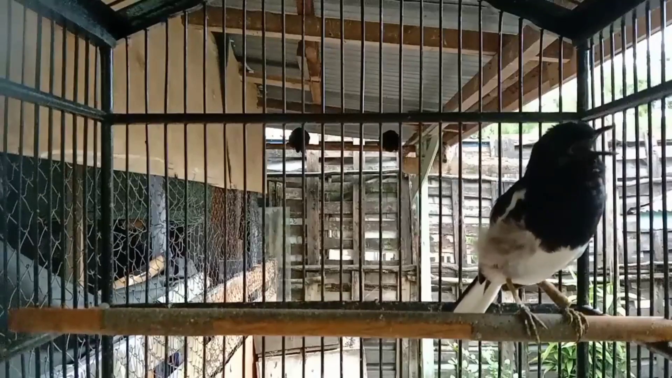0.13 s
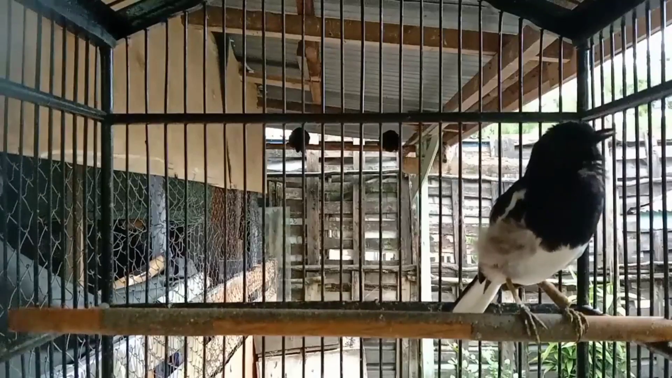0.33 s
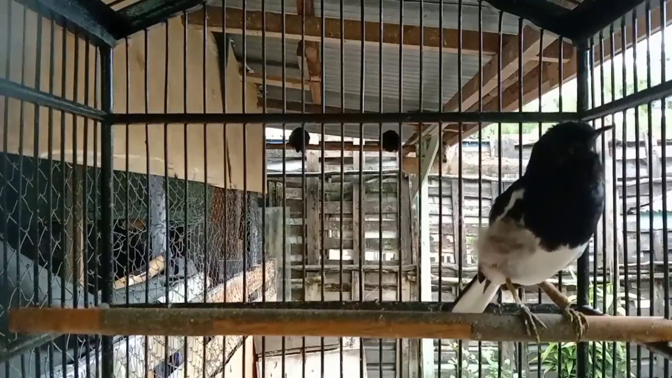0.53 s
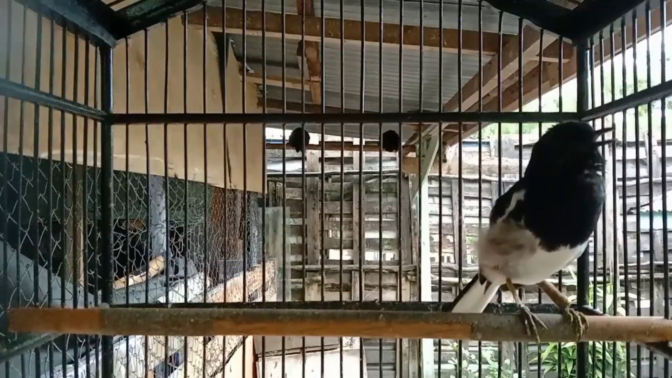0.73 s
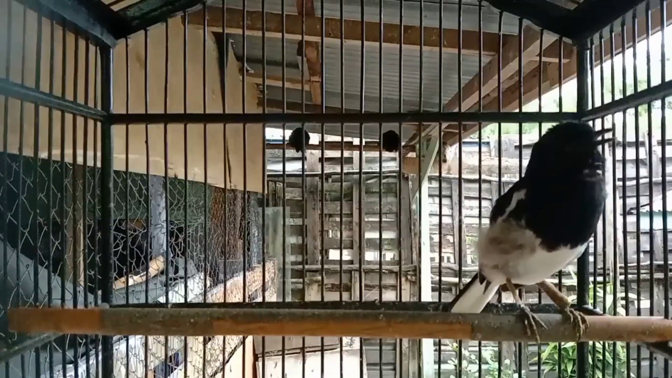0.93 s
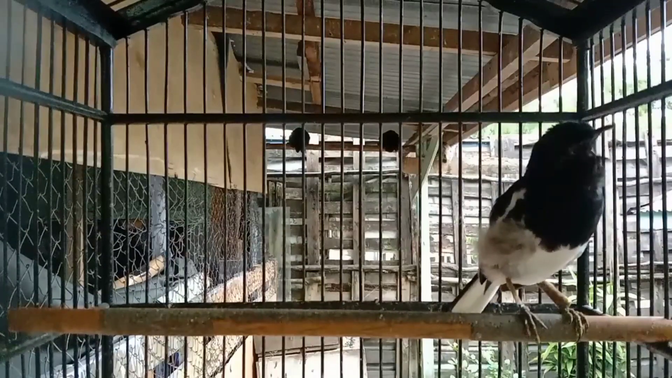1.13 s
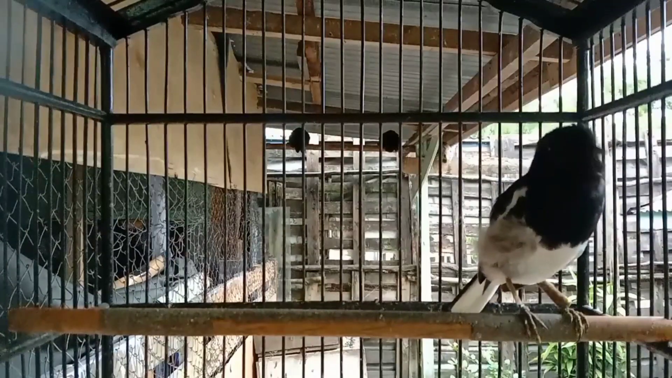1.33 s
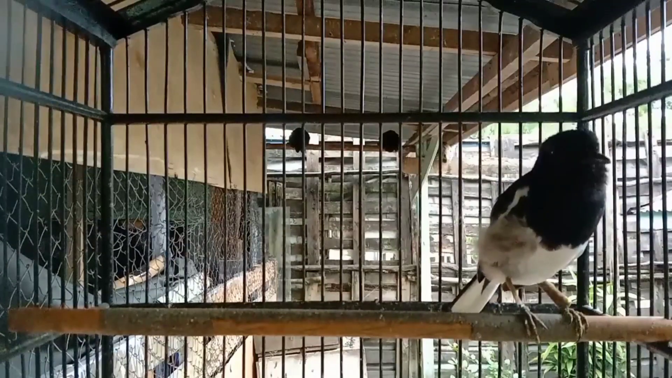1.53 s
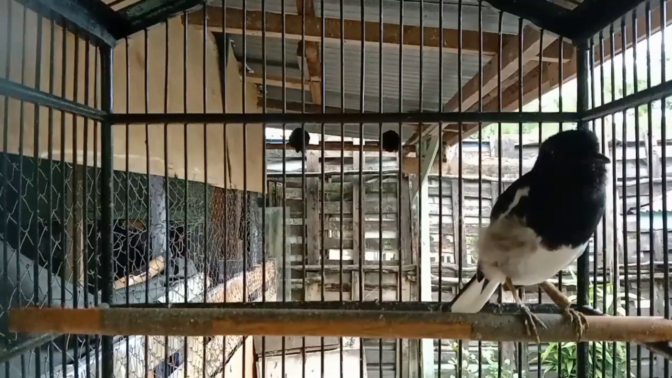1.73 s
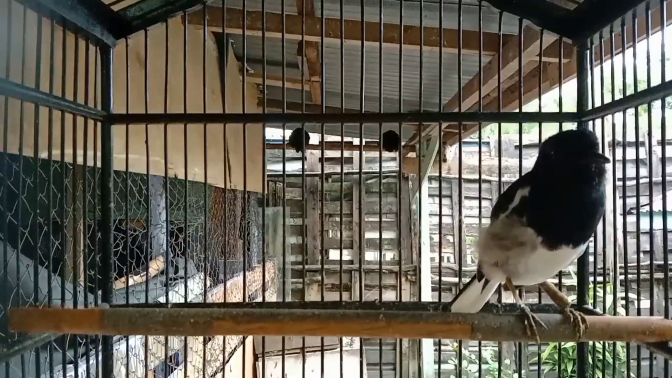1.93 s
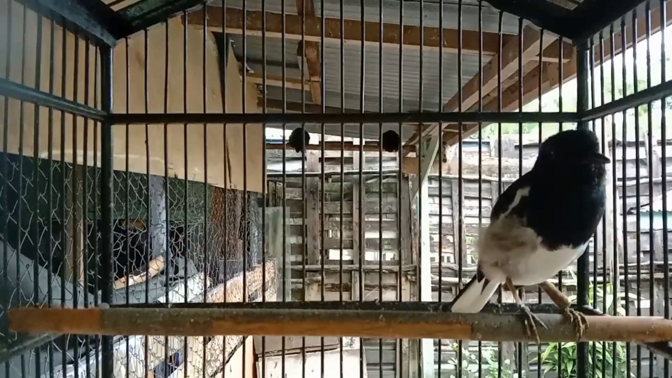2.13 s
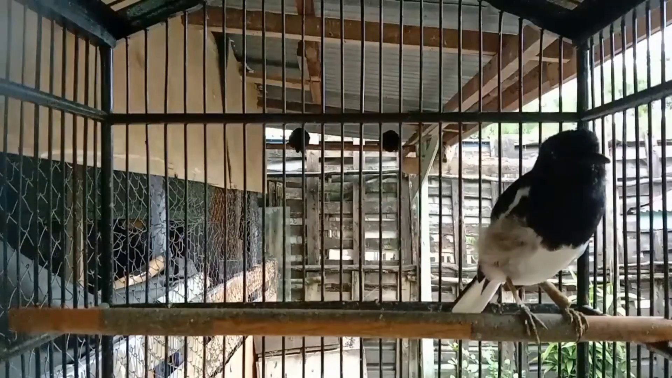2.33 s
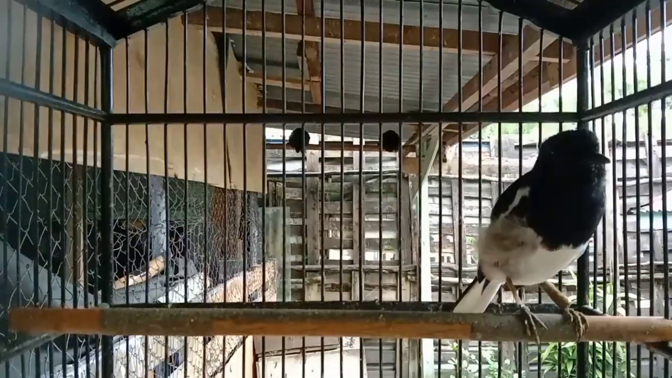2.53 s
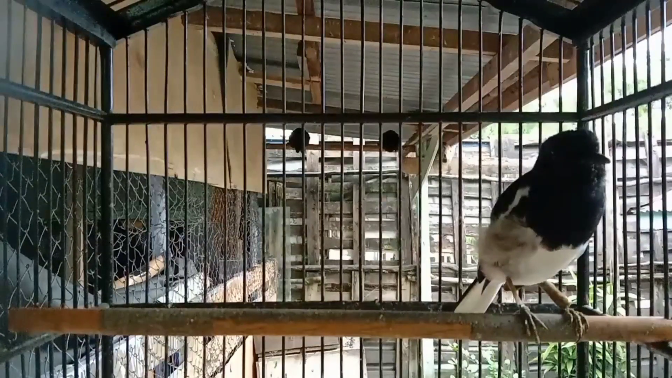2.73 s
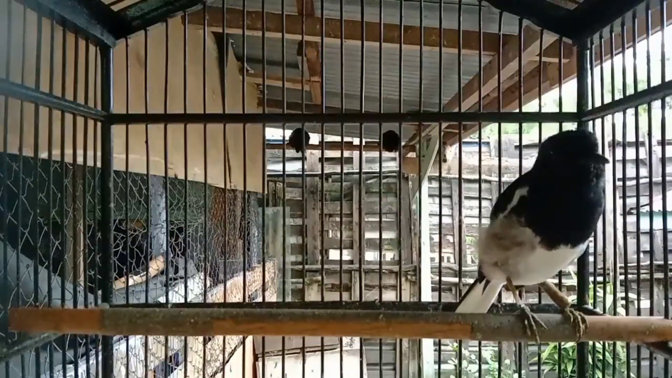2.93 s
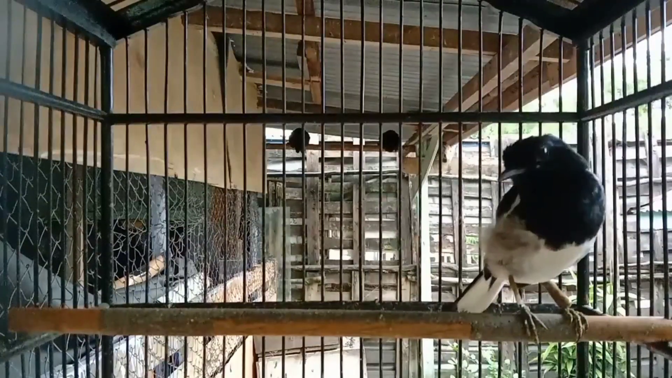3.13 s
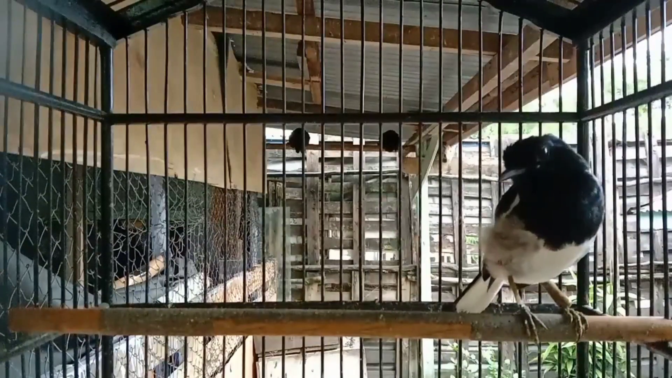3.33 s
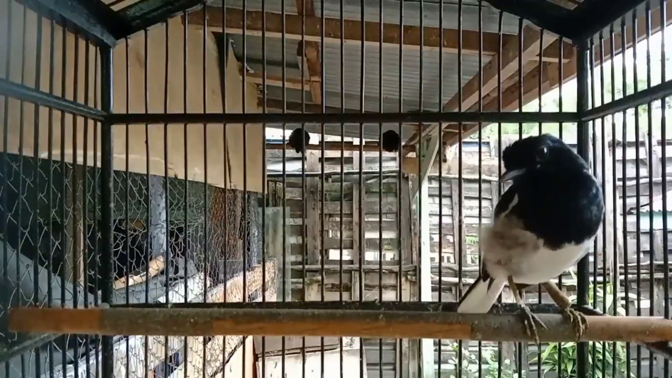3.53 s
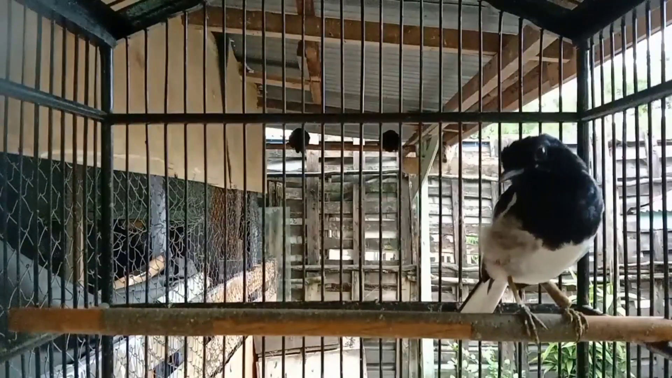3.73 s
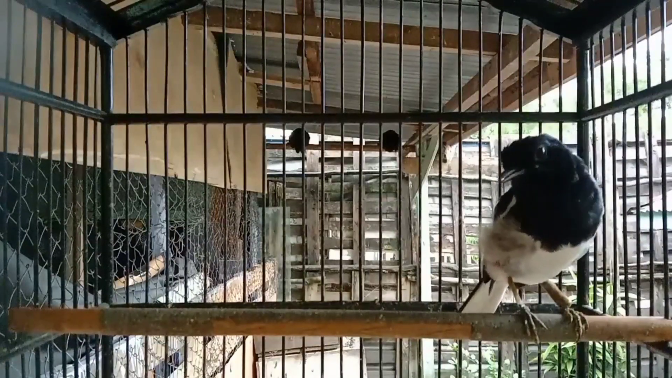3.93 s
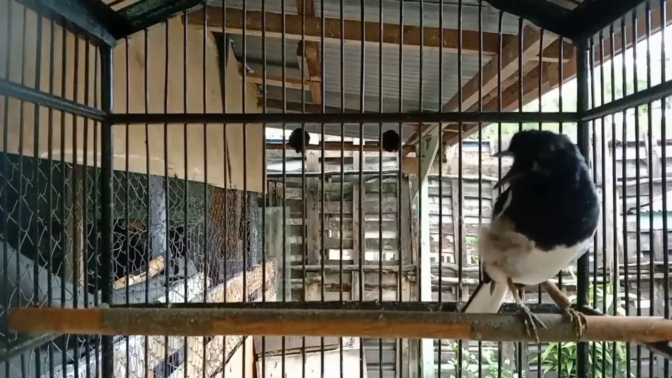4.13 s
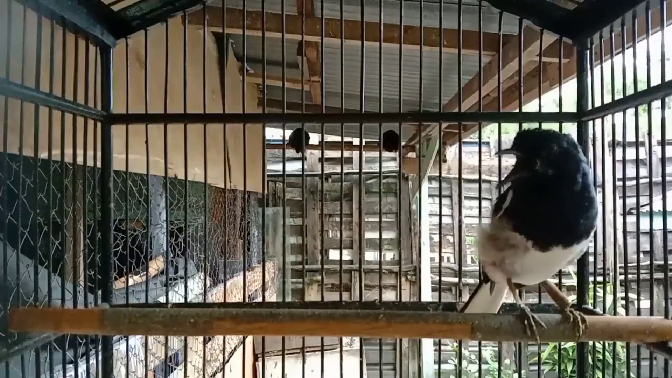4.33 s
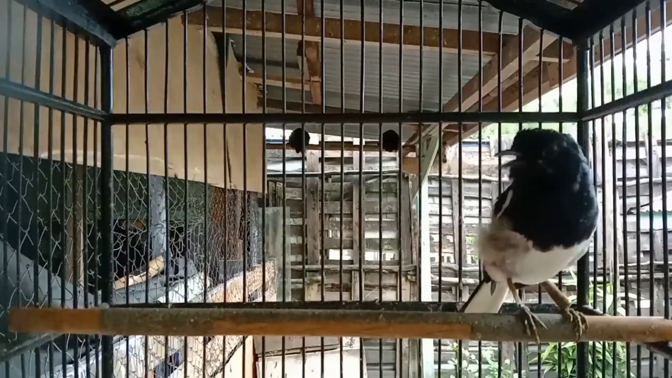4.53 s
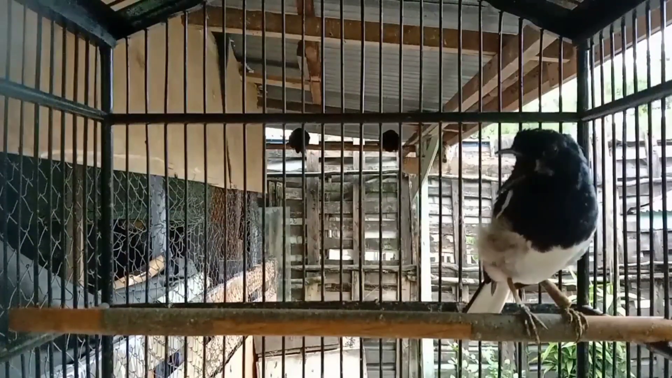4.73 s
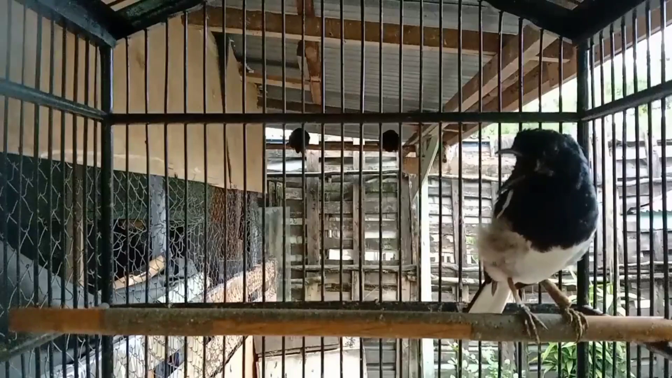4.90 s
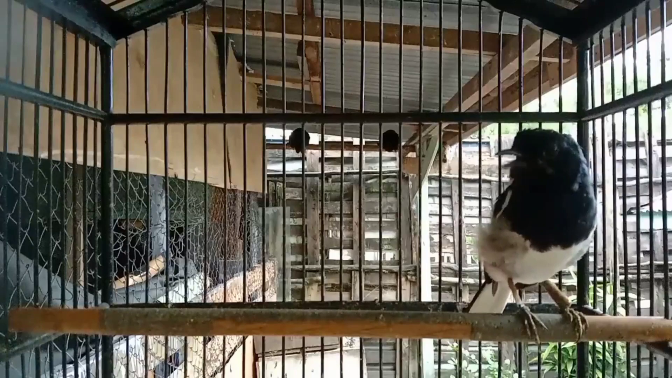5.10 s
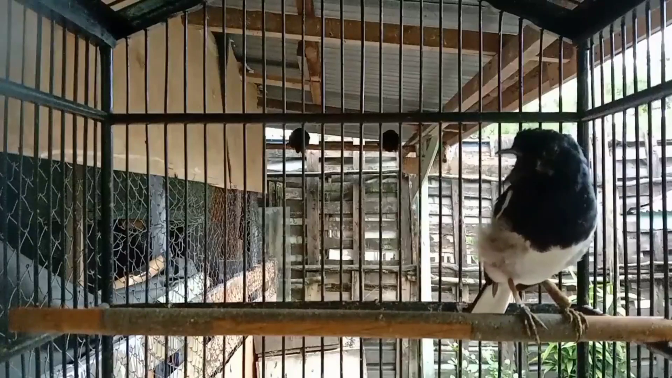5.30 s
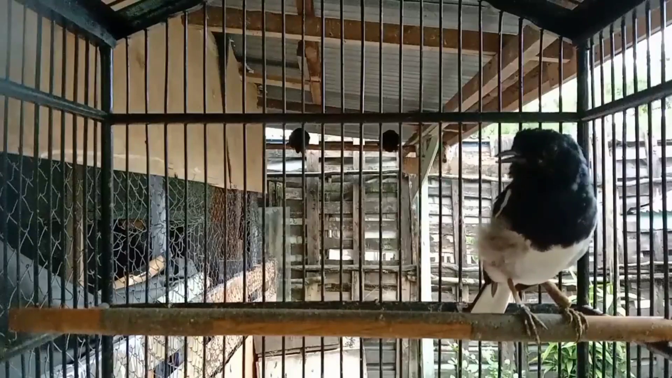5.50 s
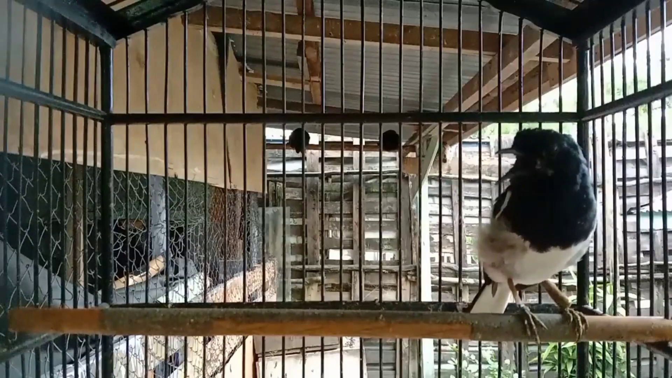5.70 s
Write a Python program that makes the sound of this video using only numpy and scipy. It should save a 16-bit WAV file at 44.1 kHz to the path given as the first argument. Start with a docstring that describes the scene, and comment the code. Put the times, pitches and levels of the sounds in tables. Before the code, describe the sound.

Bright, rapid whistles leap up and down as a songbird sings close by in a cage in an open shed. A pause leaves soft distant whistles, thin high chirps and a light outdoor hiss and rumble. The song returns with a briefly raspy trill, a high held whistle and several quick notes. The cage ticks faintly a few times, and the background dips slightly while the song is loud.

```python
"""Under a shed roof, a caged songbird close to the microphone sings two bursts of whistled phrases,
the second with a trill that cracks. Its syrinx gives a near sine, coloured by throat and beak.
Another bird answers softly from farther off, small birds twitter, and the cage ticks. Outdoor hiss
and rumble fill the pause; the recorder's gain control turns them down while the song is loud."""
import sys
import numpy as np
from scipy import signal
from scipy.io import wavfile
from scipy.ndimage import uniform_filter1d

SR = 44100
rng = np.random.default_rng(int(sys.argv[2]) if len(sys.argv) > 2 else 0)


def int16_out(signal):
    """Quantize to a 16-bit WAV file."""
    q = np.round(np.clip(np.atleast_2d(signal).T, -1, 1) * 32767)
    wavfile.write(sys.argv[1], SR, q.astype(np.int16))


N = 254016


def songbird(leap_hz_per_s=153000, glide_hz_per_s=110000):
    """Whistled syllables: the fundamental's strength follows its pitch, the overtones follow effort."""
    # Each row: effort in dB, its drift by the end in dB, overtone level re effort in dB at the start
    # and at the end, pitch path as (seconds, Hz).
    syllables = [ (-8, -1.5, -21.5, -18.5, [(-.01, 2574), (0.004, 2437), (0.013, 3190), (0.02, 3600),
                 (0.031, 3520), (0.047, 3745), (0.058, 3090), (0.068, 3190), (0.077, 3605), (0.084, 2830),
                 (0.102, 2920), (0.108, 3190), (0.125, 2120)]), (-8, -2, -19, -25, [(0.217, 1810),
                 (0.228, 2840), (0.234, 3160), (0.25, 3182), (0.275, 3390), (0.283, 3226), (0.291, 2460)]),
                 (-7.5, -1, -19, -24, [(0.317, 1980), (0.327, 2627), (0.341, 2950), (0.352, 2930),
                 (0.363, 2845), (0.386, 3347), (0.394, 3010), (0.401, 2630)]),
                 (-8, 5.5, -42, -37, [(0.47, 1615), (0.485, 1866), (0.517, 1738), (0.537, 1710),
                 (0.542, 2090), (0.55, 2040)]), (-6, 1, -29, -29.5, [(0.548, 2010), (0.556, 2454),
                 (0.565, 2525), (0.617, 2466), (0.628, 2530)]), (-7.5, -3.5, -27, -27, [(0.72, 3294),
                 (0.73, 3590), (0.749, 3920), (0.762, 5450), (0.769, 3820), (0.777, 3270), (0.792, 2440),
                 (0.81, 2273), (0.857, 2310), (0.917, 2100), (0.925, 1613), (0.937, 1585)]),
                 (-7.5, -5, -18.5, -15.5, [(1.01, 1510), (1.025, 3280), (1.031, 3680), (1.039, 3880),
                 (1.05, 3460), (1.075, 2500), (1.083, 1840)]), (-12, 9.5, -26.5, -35, [(1.086, 1890),
                 (1.091, 2123), (1.12, 2130), (1.147, 2240), (1.174, 2335), (1.19, 2385)]),
                 (-7, -8, -28.5, -12.5, [(1.266, 1605), (1.282, 3076), (1.289, 3438), (1.3, 3010),
                 (1.338, 1845)]), (-3, -4, -35, -31.5, [(1.343, 1965), (1.361, 2042), (1.383, 2078),
                 (1.424, 2268), (1.448, 2280)]), (-10.5, 2, -27, -27, [(3.938, 1716), (3.946, 2574),
                 (3.954, 2771), (4.003, 2565), (4.058, 2390), (4.088, 2170), (4.104, 1590)]),
                 (-7.5, -3.5, -22, -25.5, [(4.774, 3730), (4.783, 3712), (4.833, 3836), (4.918, 3693),
                 (5.019, 3818), (5.036, 4110)]), (-18, 6.5, -33.5, -24, [(5.022, 3810), (5.047, 4560),
                 (5.092, 4887), (5.128, 4830), (5.181, 4500), (5.206, 4140), (5.227, 3804), (5.242, 3236)]),
                 (-9, -1, -29, -26.5, [(5.355, 1824), (5.371, 2690), (5.397, 2520), (5.413, 2416),
                 (5.435, 2352), (5.46, 2487), (5.472, 2720)]), (-8.5, -6, -21.5, -12.5, [(5.456, 2500),
                 (5.466, 2900), (5.479, 3730), (5.489, 2974), (5.498, 2967), (5.509, 3733), (5.516, 2985),
                 (5.527, 2834), (5.534, 3220), (5.543, 2490), (5.559, 2927), (5.574, 2377), (5.582, 2380)]),
                 (-12, 3, -18.5, -27, [(5.718, 2050), (5.731, 2930), (5.741, 3244), (5.78, 3291)]), ]
    # How strongly the fundamental carries. Each row: pitch in Hz, gain in dB.
    carry = [(1600, -11.5), (1750, -8.5), (1950, -14), (2080, -5), (2180, -7.5), (2250, -16.5), (2295, -8),
             (2335, -7), (2385, -11), (2490, 1), (2750, -6.5), (2950, 3), (3250, 4), (3550, 2), (3750, 0),
             (3900, -2.5), (4450, -4), (4650, -0.5), (4900, -4), (5400, -39)]
    out = np.zeros(N)
    for effort_db, drift_db, *overtone_ends_db, path in syllables:
        t, (hz,) = curves(path)
        speed_hz_per_s = uniform_filter1d(abs(np.gradient(hz)), size=200) * SR
        leap_db = -13 * np.tanh((speed_hz_per_s / leap_hz_per_s) ** 2)  # fundamental dips on leaps
        glide_db = -5 * np.tanh(speed_hz_per_s / glide_hz_per_s)  # overtones thin on glides
        shape_db = read(carry, hz) + leap_db + swell(t, attack_s=.014, release_s=.013)
        level_db = effort_db + drift_db * np.linspace(0, 1, len(t)) + shape_db
        bloom_db = swell(t, attack_s=.019, release_s=.012)
        overtones_db = np.linspace(*overtone_ends_db, len(t)) + bloom_db + glide_db - shape_db
        tone, _ = whistle(hz, level_db, overtones_db)
        add(out, max(t[0], 0), faded(tone[t >= 0]))
    return out


def trill(first_flick_s=4.2745, break_s=4.304):
    """A held note flicked upward 45-62 times a second; early flicks break the voice."""
    # Each row: time in seconds, lowest pitch in Hz, upward flick in Hz, effort in dB.
    path = [(4.26, 2900, 350, -1.5), (4.31, 2894, 249, -5), (4.351, 2839, 345, -1.5),
            (4.439, 2874, 428, -4), (4.531, 2972, 385, -4), (4.67, 2943, 292, -4.5)]
    t, (low_hz, flick_hz, effort_db) = curves(path)
    flicks_per_s = np.interp(t, [4.26, 4.34, 4.435, 4.51, 4.67], [62, 60, 45, 57.5, 57])
    flicks = np.cumsum(flicks_per_s) / SR
    cycle = np.pi * (flicks - np.interp(first_flick_s, t, flicks))
    flick = np.cos(cycle + .45 * np.sin(cycle) ** 2) ** 2  # skewed pulse
    throb = 1 - .62 * np.cos(2 * cycle - .3) ** 2  # two dips a flick
    hoarse = np.exp(-abs(t - break_s) / np.where(t < break_s, .023, .039))
    crack = hoarse * flick ** 3
    dropout_db = uniform_filter1d(-34 * hoarse ** 3 * (t < break_s), size=200)
    level_db = effort_db + swell(t, attack_s=.015, release_s=.029) + dropout_db
    tone, phase = whistle(low_hz + flick_hz * flick ** 1.5, level_db - 12 * crack, overtones_db=-26.5)
    # Broken voice: rasp and an unsteady line between the first two harmonics.
    rasp_band = signal.butter(3, [2200, 12000], "band", fs=SR, output="sos")
    rasp = signal.sosfilt(rasp_band, rng.standard_normal(len(t)))
    broken = .4 * wander(len(t), size=40) * np.sin(1.6 * phase) + .18 * rasp
    out = np.zeros(N)
    add(out, path[0][0], faded(throb * tone + crack * gain_of(level_db) * broken))
    return out


def whistle(hz, level_db, overtones_db, shake_hz=7, flutter_db=.3):
    """The syrinx swings as an unsteady near sine with weak overtones. Returns tone and phase."""
    # Each row: harmonic number, level in dB.
    overtones = [(2, 3.5), (3, -2), (4, -12.5), (5, -17.5), (6, -16), (7, -12)]
    # Throat and beak colour on the overtones. Each row: frequency in Hz, gain in dB.
    beak = [(3000, -1.5), (4500, -1.5), (6000, -1.5), (7500, 0), (9500, -1), (11300, 1), (13500, -14.5),
            (14500, -2), (15300, -1)]
    phase = 2 * np.pi * np.cumsum(hz + shake_hz * wander(len(hz), size=60)) / SR
    upper = sum(gain_of(db + read(beak, k * hz)) * np.sin(k * phase) * (k * hz < SR / 2)
                for k, db in overtones)
    waver = 1 + .3 * wander(len(hz), size=300)
    tone = np.sqrt(2) * (np.sin(phase) + gain_of(overtones_db) * waver * upper)
    return tone * gain_of(level_db + flutter_db * wander(len(hz), size=90)), phase


def answering_bird():
    """Purer, softer whistles from farther away."""
    # Each row: level in dB, its drift by the end in dB, pitch path as (seconds, Hz).
    notes = [ (-51.5, -3, [(1.565, 1876), (1.632, 1950), (1.68, 2020)]), (-50.5, -4, [(1.63, 2390),
             (1.667, 2660), (1.72, 2630)]), (-38, -11, [(1.74, 3990), (1.772, 3214), (1.82, 2880)]),
             (-43.5, 1, [(2.385, 2370), (2.412, 2405), (2.522, 2390), (2.586, 2383), (2.654, 2625),
             (2.68, 2620)]), (-38, -9.5, [(2.775, 3150), (2.791, 3373), (2.853, 3422), (2.919, 3400),
             (3.01, 3080)]), (-47.5, 2, [(3.045, 2740), (3.066, 3006), (3.115, 2900)]),
             (-36.5, -20, [(3.108, 2780), (3.145, 2860), (3.195, 3300)]), (-36.5, -13, [(3.18, 4300),
             (3.203, 3620), (3.265, 2800)]), (-38.5, -8, [(3.3, 2640), (3.312, 2855), (3.375, 2723)]),
             (-49.5, -7, [(3.39, 2000), (3.44, 1916), (3.5, 1830)]), (-50.5, 0, [(3.56, 1656),
             (3.588, 2410), (3.62, 2660), (3.65, 2640)]), (-41.5, -5.5, [(3.7, 3500), (3.712, 3536),
             (3.752, 3362), (3.79, 3530), (3.83, 3550)]), (-42.5, -7.5, [(4.03, 2980), (4.1, 3180),
             (4.15, 3385), (4.25, 3304)]), ]
    out = np.zeros(N)
    for level_db, drift_db, path in notes:
        t, (hz,) = curves(path)
        shape_db = swell(t, attack_s=.011, release_s=.035) + drift_db * np.linspace(0, 1, len(t))
        tone, _ = whistle(hz, level_db + shape_db, overtones_db=-40, shake_hz=25, flutter_db=1.6)
        add(out, t[0], faded(tone))
    return out


def twitter(fall_hz=406, husk_hz=260, decay_db=5.4):
    """Small distant birds: falling chirps whose pitch shakes so fast that it blurs into a band."""
    # Each row: start in seconds, length in seconds, starting pitch in Hz, starting level in dB.
    chirps = [(1.229, 0.2, 5470, -43.5), (1.49, 0.098, 5710, -42.5), (1.639, 0.15, 5660, -44),
              (1.832, 0.074, 5760, -42), (2.316, 0.062, 4370, -54.5), (2.856, 0.11, 5440, -46.5),
              (3.071, .12, 5400, -46.5), (3.37, 0.069, 5440, -48.5), (3.539, .1, 5870, -56),
              (4.13, .22, 5490, -48.5)]
    out = np.zeros(N)
    for start_s, length_s, start_hz, db in chirps:
        progress = np.arange(0, 1, 1 / (length_s * SR))
        hz = start_hz - fall_hz * progress + husk_hz * wander(len(progress), size=25)
        tone = np.sin(2 * np.pi * np.cumsum(hz) / SR)
        add(out, start_s, faded(gain_of(db - decay_db * progress) * tone))
    return out


def cage_ticks():
    """Claws or wire tick on the cage: bright, decaying snaps of noise."""
    # Each row: start in seconds, starting gain in dB, T60 in seconds.
    ticks = [(2.0687, -30, 0.044), (3.1138, -35.5, 0.13), (5.686, -38, 0.044)]
    out, t = np.zeros(N), np.arange(6000) / SR
    highpass = signal.butter(4, 6500, "high", fs=SR, output="sos")
    for start_s, db, t60_s in ticks:
        snap = signal.sosfilt(highpass, rng.standard_normal(len(t)))
        add(out, start_s, snap * gain_of(db - 60 * t / t60_s))
    return out


def outdoor_noise(rms_db=-50):
    """Hiss, a broad hum near 1.4 kHz and lumpy rumble, with drifting patches and treble flicker."""
    # Each row: frequency in Hz, relative spectral density in dB.
    spectrum = [(12, -49.5), (40, -25), (80, 4), (130, -10.5), (400, -20), (1200, -14), (1380, -3.5),
                (1900, -14), (2200, -17.5), (3500, -17.5), (4050, -26), (4700, -19.5), (6600, -10.5),
                (10400, -16.5), (11000, -24), (15600, -19)]
    frames, hz = N // 256 + 5, np.fft.rfftfreq(1024, 1 / SR)
    real, imag, patches = rng.standard_normal((frames, 513, 3)).T
    patches = uniform_filter1d(patches, size=8, axis=0)
    patches = unit_rms(uniform_filter1d(patches, size=16, axis=1))
    depth_db = 1.3 + 5 * np.exp(-((hz[:, None] - 5200) / 1100) ** 2)  # far chatter comes and goes
    flicker_db = 1.7 * np.outer(np.clip(hz / 9000, 0, 1), wander(frames, size=3))
    lumps_db = 2.5 * np.outer(1 / (1 + (hz / 150) ** 2), wander(frames, size=8))
    level_db = read(spectrum, hz)[:, None] + depth_db * patches + flicker_db + lumps_db
    _, noise = signal.istft((real + 1j * imag) * gain_of(level_db), nperseg=1024, noverlap=768)
    return gain_of(rms_db) * unit_rms(noise[:N])


def shed_echoes(x):
    """Early reflections off roof and boards."""
    # Each row: delay in seconds, gain in dB.
    echoes = [(.0021, -15.5), (.0047, -13.5), (.0083, -14), (0.0133, -24), (.022, -27)]
    out = np.zeros(N)
    for delay_s, db in echoes:
        add(out, delay_s, gain_of(db) * x)
    return out


def shed_reverb(x, delay_samples):
    """Diffuse tail: sparse random taps, each band dying at its own rate."""
    # Each row: frequency in Hz, T60 in seconds.
    decay = [(1500, .22), (2500, .21), (3200, .26), (4500, .17), (12000, .15)]
    taps = np.zeros(SR)
    slots = np.arange(delay_samples, SR - 20, 20)
    taps[slots + rng.integers(0, 20, len(slots))] = rng.choice([-1., 1.], len(slots))
    hz, t, bands = signal.stft(taps, SR, nperseg=256)
    _, tail = signal.istft(bands * gain_of(-60 * t / read(decay, hz)[:, None]), SR, nperseg=256)
    return signal.fftconvolve(x, tail / np.linalg.norm(tail))[:N]


def curves(rows):
    """Sample times and each column, corners rounded over 3 ms as muscles cannot jerk."""
    times_s, *columns = np.transpose(rows)
    t = np.arange(times_s[0], times_s[-1], 1 / SR)
    return t, [uniform_filter1d(np.interp(t, times_s, c), size=130, mode="nearest") for c in columns]


def swell(t, attack_s, release_s, ends_db=-23):
    """Envelope in dB: curves up, holds at 0, curves down."""
    onset = np.clip(1 - (t - t[0]) / attack_s, 0, 1) ** 2.2
    ending = np.clip(1 - (t[-1] - t) / release_s, 0, 1) ** 2.5
    return ends_db * (onset + ending)


def faded(x):
    """Linear 2 ms ends."""
    ramp = np.minimum(np.arange(len(x)) / (.002 * SR), 1)
    return x * np.minimum(ramp, ramp[::-1])


def wander(length, size):
    """Noise of rms 1, smoothed twice over size points."""
    return unit_rms(uniform_filter1d(uniform_filter1d(rng.standard_normal(length), size), size))


def read(points, hz):
    """Interpolates a table over log frequency."""
    points_hz, values = np.transpose(points)
    return np.interp(np.log(hz + 1), np.log(points_hz + 1), values)


def add(mix, start_s, sound):
    """Mixes a sound in place."""
    part = mix[round(start_s * SR):][:len(sound)]
    part += sound[:len(part)]


def gain_of(db):
    return 10 ** (np.asarray(db) / 20)


def unit_rms(x):
    return x / np.sqrt(np.mean(x ** 2) + 1e-20)


def scene():
    """Near bird and cage with echoes, far birds with more reverb, outdoor noise; mono."""
    near = songbird() + trill() + cage_ticks()
    far = answering_bird() + twitter()
    near_tail = gain_of(-14) * shed_reverb(near, delay_samples=500)
    far_tail = gain_of(-5) * shed_reverb(far, delay_samples=200)
    return (near + shed_echoes(near) + near_tail + far + far_tail + outdoor_noise())[None]


def record(dry, threshold_db=-44, recovery_db_per_s=130, bass_hz=200, cutoff_hz=15700):
    """Gain control, slight for mid and treble, deep for bass; then the band limit."""
    loud_db = 10 * np.log10(abs(uniform_filter1d(dry[0] ** 2, size=2000)) + 1e-12)
    recovery_db = np.arange(N) * recovery_db_per_s / SR
    held_db = np.maximum.accumulate(loud_db + recovery_db) - recovery_db
    over_db = uniform_filter1d(np.maximum(held_db - threshold_db, 0), size=6000)
    bass = signal.sosfiltfilt(signal.butter(2, bass_hz, fs=SR, output="sos"), dry)
    ducked = (dry - bass) * gain_of(-.09 * over_db) + bass * gain_of(-.38 * over_db)
    lowpass = signal.firwin(2047, cutoff_hz, window=("kaiser", 11), fs=SR)
    return signal.oaconvolve(ducked, lowpass[None], "same")


dry = scene()
out = record(dry)
int16_out(out)
```